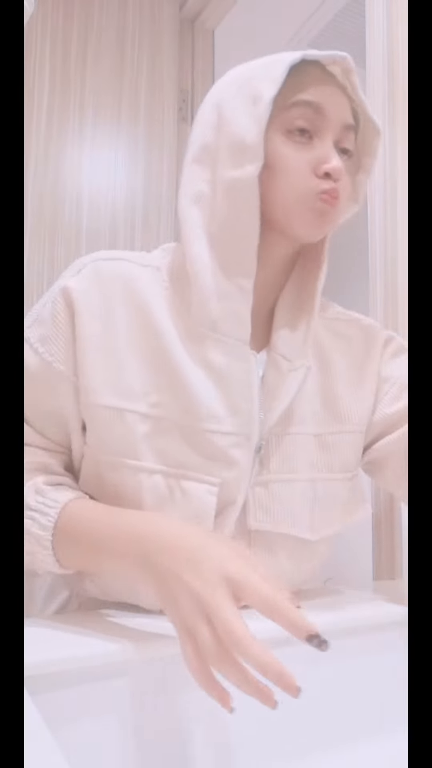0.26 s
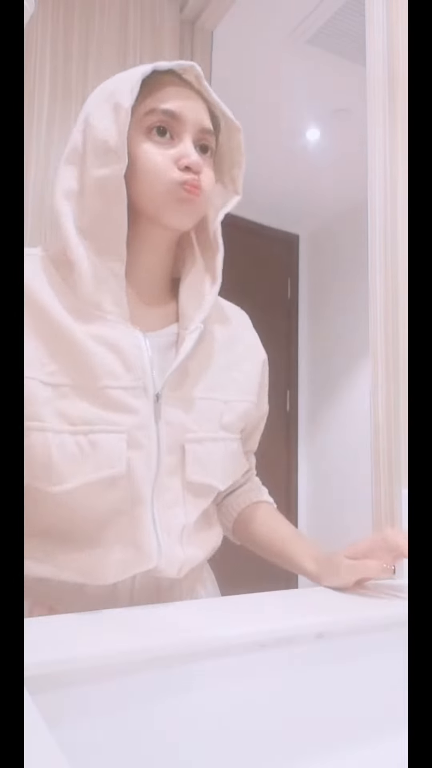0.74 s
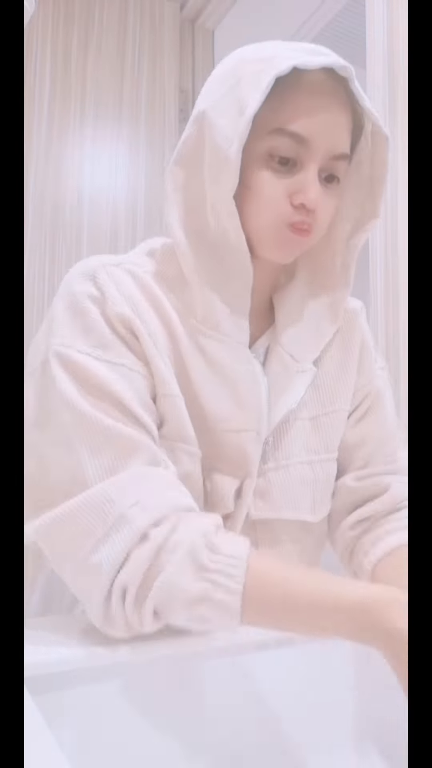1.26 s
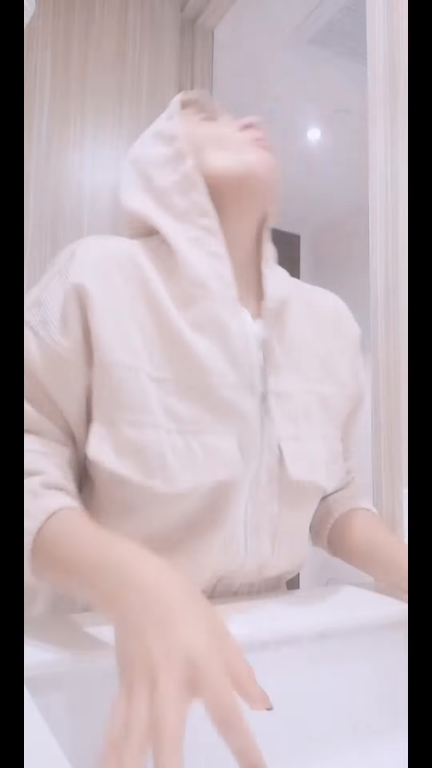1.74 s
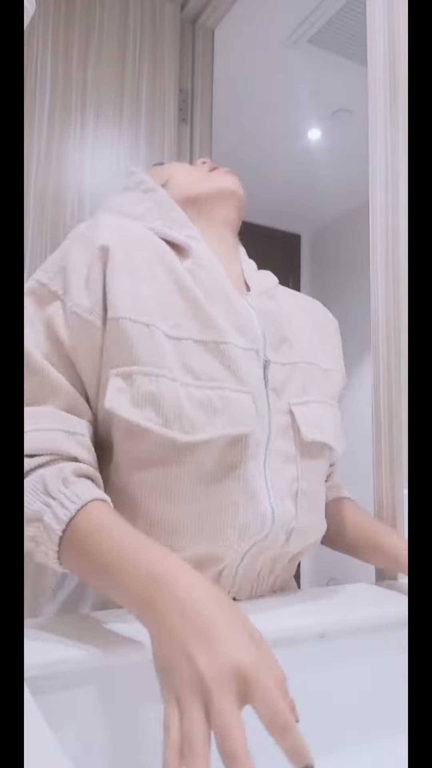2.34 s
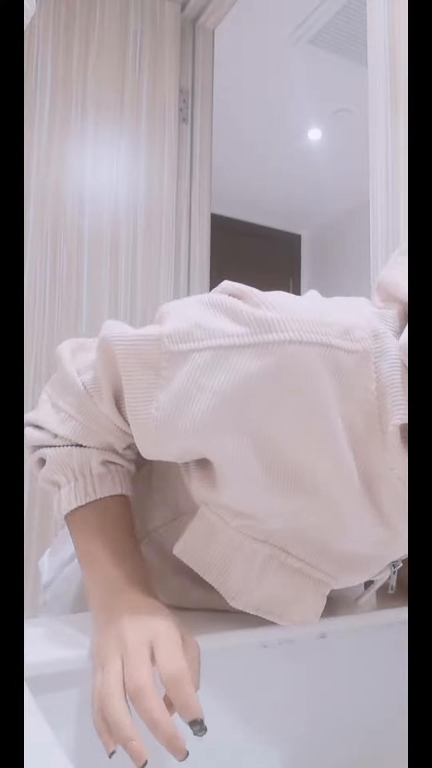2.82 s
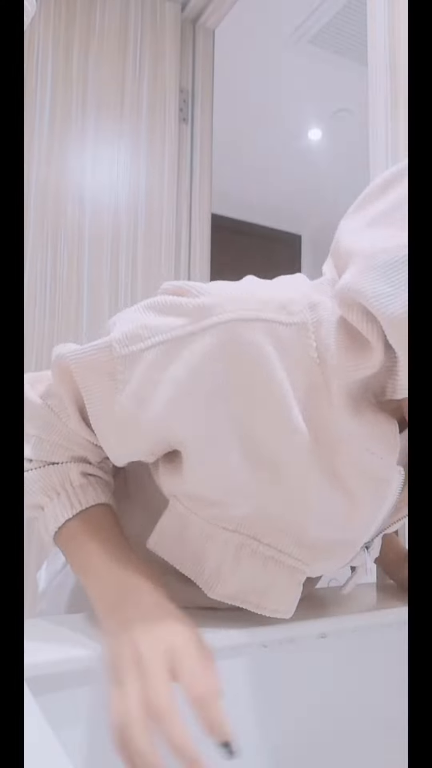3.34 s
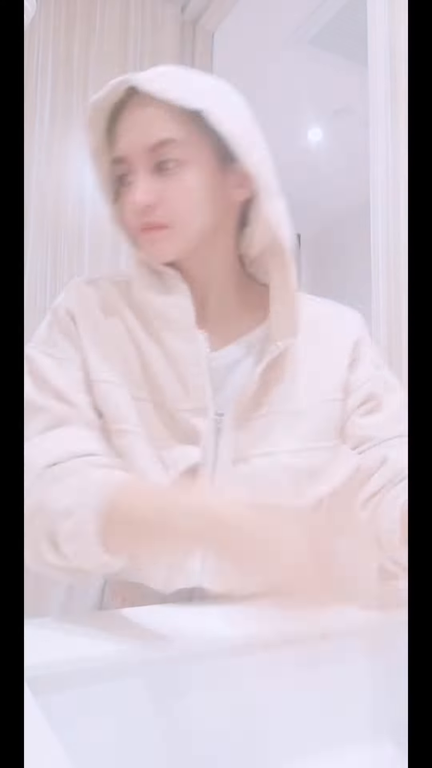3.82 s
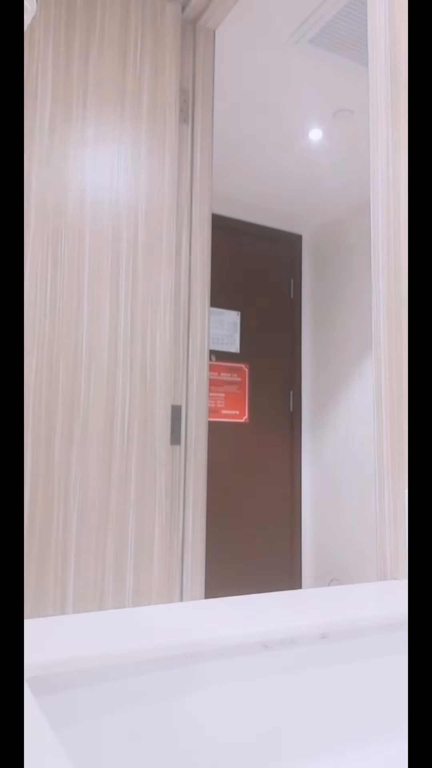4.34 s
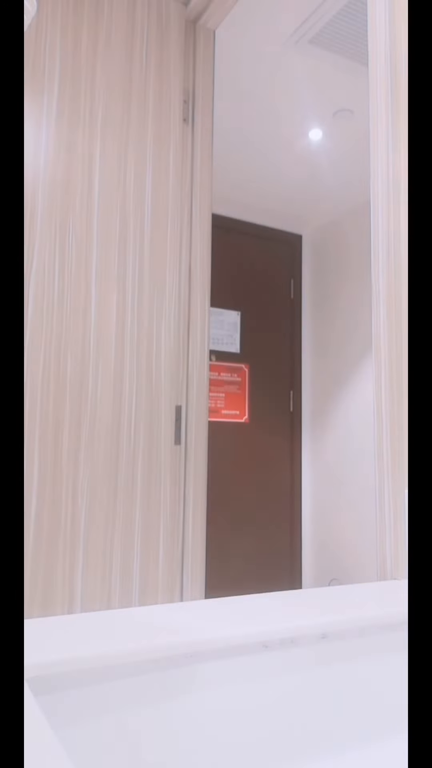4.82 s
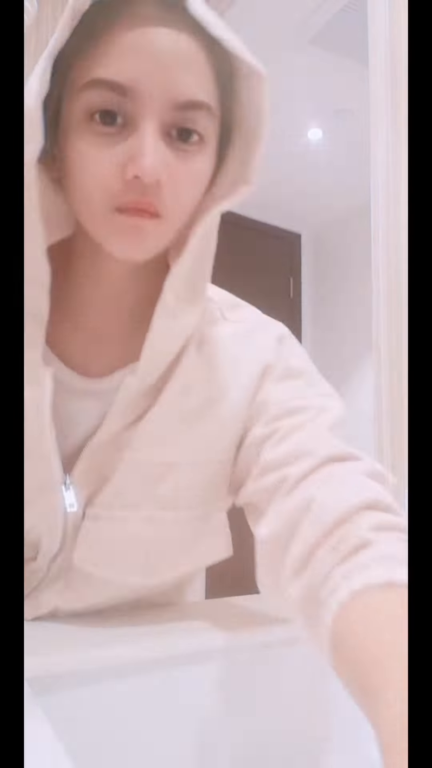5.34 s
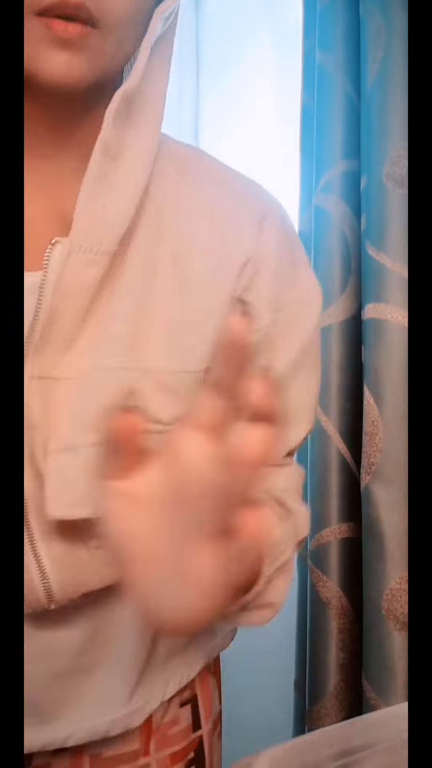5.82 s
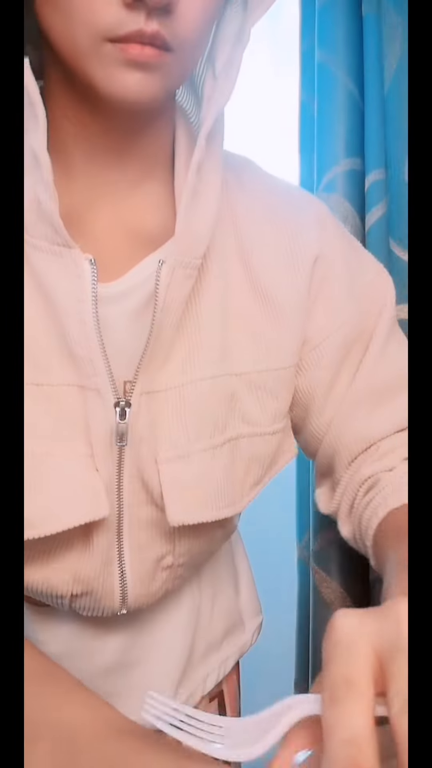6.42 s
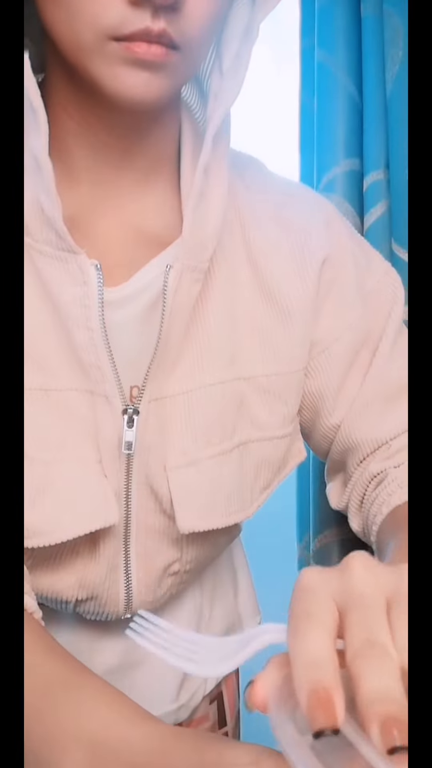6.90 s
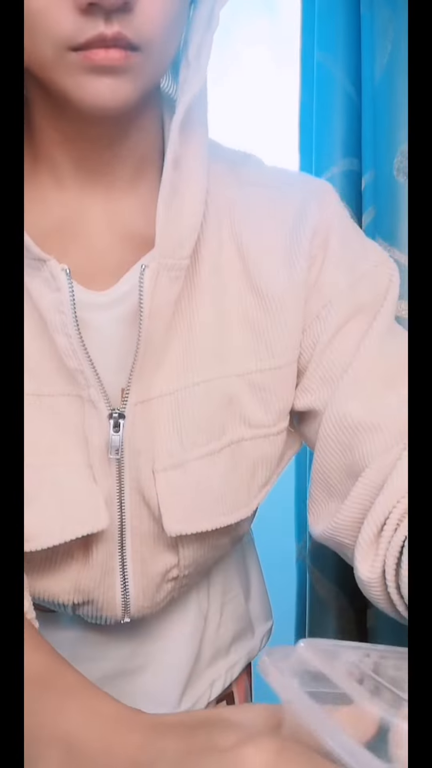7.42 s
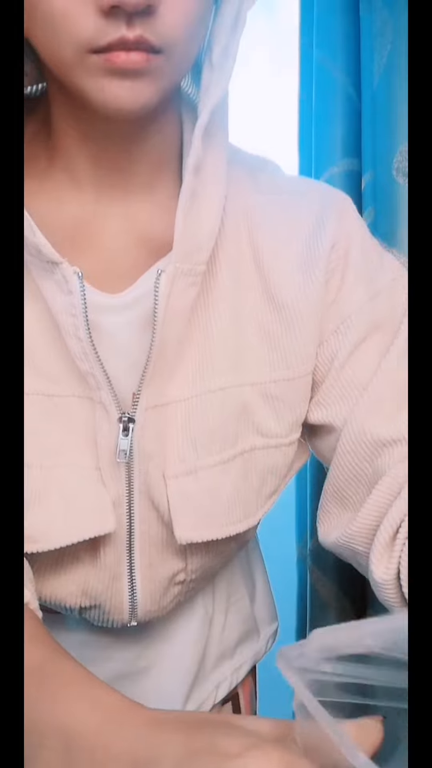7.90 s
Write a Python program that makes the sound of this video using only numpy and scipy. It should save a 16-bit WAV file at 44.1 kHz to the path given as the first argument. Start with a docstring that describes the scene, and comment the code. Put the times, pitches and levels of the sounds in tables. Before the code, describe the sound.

Close phone microphone in a small bathroom: a tap hisses hard into a basin while the drain gurgles, with low knocks at the start and splashing hands, plus one heavy thump midway. The water cuts off abruptly, a few drops plink and cloth rustles faintly over low room rumble. A blink of near silence, then a quieter room where a thin plastic food box snaps, creaks and scrapes irregularly until the end.

```python
"""First you hear a tap hissing into a bathroom basin, a gurgling drain, and hands that knock and splash.
The tap shuts, drops fall and cloth brushes; the sound almost vanishes for a moment, then a quieter room
follows, where a thin plastic food box and fork snap and scrape. Water and plastic noises are shaped random
noise; drain bubbles, drops and knocks are fading tones. One phone microphone, the same in both channels."""
import sys
import numpy as np
from scipy import signal
from scipy.fft import rfft, irfft, next_fast_len
from scipy.io import wavfile
from scipy.ndimage import uniform_filter1d, map_coordinates

SR = 44100
rng = np.random.default_rng(int(sys.argv[2]) if len(sys.argv) > 2 else 0)


def store_wav(level_fs):
    """Save 16-bit WAV to argv[1]."""
    pcm = np.round(np.clip(np.atleast_2d(level_fs), -1, 1) * 32767)
    wavfile.write(sys.argv[1], SR, pcm.T.astype(np.int16))


N = 359856

# Colour of the water's hiss: (frequency [Hz], level [dB per Hz])
HISS_COLOUR = [(290, -32), (500, -14.5), (925, -8), (1080, -0.5), (1380, -7.5), (1760, -1.5), (2060, -7),
               (2830, 1.5), (3450, -8), (5950, -5.5), (9400, -8), (11700, -11.5), (15300, -21.5)]
# Bands lifted by the basin's bowl: (frequency [Hz], width [Hz], lift [dB])
BOWL_BANDS = [(1040, 180, 1.5), (1750, 110, 3.5), (2814, 430, -4.5), (4430, 180, 0.5), (5950, 260, 2.5),
              (9000, 670, 1), (12765, 32, 3), (12700, 36, 2)]
# Hands cross the jet and shade it: (start [s], end [s], hiss lost [dB])
HANDS_IN_JET = [(1.12, 1.298, 2), (1.334, 1.437, 5.5), (1.447, 1.72, 3)]
# The jet's steady hiss, and its splash and finest spray compared with that hiss [dB]
HISS_DB, SPLASH_DB, SPRAY_DB = -22.5, -4, -10.5
# Each dB of hiss lost to a hand changes splash and spray by this many dB
HAND_EDGE_S, HAND_SPLASH, HAND_SPRAY = 0.04, 1.36, -0.6
# The valve closes ever faster; splash and spray fade faster still
SHUT_S, SHUT_DB_PER_S2, DULL_DB_PER_S = 4.01, 4000, 130

# Bubbles gulped by the drain: (time [s], level [dB])
GURGLE_LEVEL = [(0.0, -20.5), (0.2, -24), (0.5, -28), (0.66, -21.5), (0.88, -21.5), (1.0, -27),
                (1.12, -24.5), (1.21, -45), (1.33, -25.5), (1.4, -34), (1.445, -21.5), (1.54, -35.5),
                (1.7, -34), (1.79, -23.5), (1.92, -19.5), (2.07, -24), (2.55, -27), (2.66, -21.5),
                (2.85, -26.5), (3.17, -27), (3.24, -38.5), (3.98, -41.5), (4.03, -33), (4.17, -39),
                (4.22, -26), (4.27, -55)]
# Bubble sizes: (frequency [Hz], pitch spread [natural log], rate [per s],
# life [cycles; a 60 dB fade takes three times as many], level [dB])
BUBBLE_SIZES = [(349.4, 0.047, 200, 11.2, 1.5), (805, 0.023, 28, 14, -14), (1070, 0.03, 28, 46, -18.5)]
GULP_DB = 1.4  # strength of the quick surges

# Snaps of the plastic: (time [s], level [dB], low band [dB], high band [dB], panel frequency [Hz])
BOX_SNAPS = [(6.109, -8.5, -13, -15, 1720), (6.115, -9.5, 4, -4.5, 2080), (6.128, -14, -11, -13, 1490),
             (6.16, -16, 9, -18, 1950), (6.171, -18, 2, -18, 1600), (6.264, -12.5, -2, -16, 1605),
             (6.305, -10, -2.5, -19.5, 1650), (6.398, -8, -6.5, -12, 1460), (6.438, -19, -2, -24, 1410),
             (6.459, -18, -9, -20, 1300), (6.552, -19, -6, -14, 1660), (6.581, -16.5, -25, -17, 1380),
             (6.6, -28, -22, 3, 1630), (6.623, -20, -3.5, -19, 1700), (6.684, -28.5, -1, -13, 1580),
             (6.806, -12.5, -14, 0.5, 5800), (6.85, -1.5, -22, -13.5, 2280), (6.968, -30.5, -6, -18, 2250),
             (7.134, -26.5, 2.5, -9, 4370), (7.359, -21, -17, -6.5, 2060), (7.427, -17.5, -6, -11, 1420),
             (7.483, -5.5, -3.5, -8, 2720), (7.591, -21, -12, -14, 1710), (7.629, -9, -18, -14, 1350),
             (7.639, -11.5, -13, -5.5, 2050), (7.794, -20, -6, -19, 1990), (7.866, -19, -18, -4, 2060),
             (7.891, -4.5, -4.5, -4.5, 1130), (7.954, -11.5, -6, -6, 1190), (8.007, -10.5, -9, -8, 2640),
             (8.037, -17, -8, -2.5, 2940), (8.085, -7.5, -5, -16, 2820), (8.095, -13.5, -12, -16, 1300)]
# Slips and scrapes of the lid: (start [s], end [s], level [dB], low band [dB], high band [dB],
# panel frequency [Hz], swell [share of the length])
LID_SCRAPES = [(6.092, 6.118, -25.5, -1, -5.5, 7500, 0.37), (6.114, 6.167, -21.5, 4.5, -16, 2160, 0.17),
               (6.201, 6.242, -25, 7.5, -12.5, 3500, 0.39), (6.329, 6.373, -10, -12.5, -19.5, 1440, .45),
               (6.337, 6.37, -15.5, -9.5, -27, 3050, .4), (6.476, 6.523, -34, -8, -6, 2480, 0.35),
               (6.552, 6.622, -34, -13, -9, 1600, 0.34), (6.779, 6.825, -33, -9, 0, 4970, .5),
               (6.824, 6.879, -25.5, -16, -6.5, 2340, 0.55), (7.196, 7.235, -14.5, 0, -15, 3130, 0.43),
               (7.344, 7.383, -28.5, -8, -12.5, 2200, .5), (7.43, 7.457, -41, -5, 1, 7540, .15),
               (7.459, 7.507, -32.5, -17, -4, 2500, .4), (7.55, 7.57, -44, -8, -5, 2000, .4),
               (7.586, 7.666, -33, -7, -9, 2000, .2), (7.737, 7.77, -31.5, -3.5, -11, 2490, 0.11),
               (7.788, 7.818, -25.5, -10, -10, 2900, 0.13), (7.821, 7.858, -22.5, -11.5, -16, 1970, 0.11),
               (7.858, 7.9, -24.5, -5.5, -11, 2900, .12), (7.892, 7.928, -16.5, 1, -7, 2970, 0.35),
               (7.957, 7.986, -38, 1, -4, 2500, .2), (8.01, 8.051, -36, -13, 2, 7950, .15),
               (8.05, 8.084, -22, -7, -12, 2840, .13), (8.096, 8.141, -15, -7.5, -7.5, 3100, 0.42)]
# Faint creaking in the hands: (time [s], level [dB])
CREAK_LEVEL = [(6.06, -56), (6.15, -49.5), (6.45, -39), (6.54, -49), (6.66, -52), (6.93, -68), (7.2, -60),
               (7.6, -53), (7.77, -47.5), (7.85, -38), (7.97, -40.5), (8.16, -43)]
# Resonances of the box: (frequency [Hz], width [Hz], strength [dB, halved in plastic()])
BOX_RESONANCES = [(697, 230, -6.5), (1600, 39, -39), (2100, 41, -19), (2520, 60, -27), (2780, 23, -38),
                  (5570, 250, -10), (7400, 93, -53)]
# Broad colour of the plastic: (frequency [Hz], level [dB per Hz])
PLASTIC_COLOUR = [(88, -16), (150, -9), (466, -2), (689, -3.5), (1790, -21), (3770, -21.5), (5460, -22.5),
                  (7770, -21.5), (14500, -40), (16000, -55)]
SNAP_T60_S = 0.018  # 60 dB fade of a snap's middle band
CRACK = 6.4  # the sudden kick of a snap over its rattle
CREAK_LOW_DB = -0.5  # the creak's low band compared with its middle band
# The second room answers the box
ECHO_DB, ECHO_T60_S, ECHO_DULL_HZ = -22.5, 0.22, 4000

# Knocks on counter and table: (time [s], thud [dB before the lift in rings()],
# frequency [Hz], 60 dB fade [s], hollow clack [dB])
KNOCK_HITS = [(0.062, -7, 201.4, 0.21, -19), (0.09, -9.5, 206, 0.17, -18), (0.171, -12, 152, 0.15, -23),
              (0.374, -10, 209.4, 0.24, -24.5), (0.43, -13.5, 221, 0.22, -30),
              (2.886, 2.5, 145.3, 0.067, -12.5), (6.116, -16.5, 245, 0.12, -36),
              (7.8, -18.5, 250, 0.052, -24), (7.893, -27, 135, 0.15, -32), (8.005, -13.5, 192, 0.042, -42)]
# The hollow clack of every knock: (frequency [Hz], width [octaves], rise [s], 60 dB fade [s])
CLACK_SHAPE = (807, 0.35, 0.00502, 0.11)
# Water thrown into the basin, and the sharp crack of the loud knock near 2.89 s: (time [s], level [dB],
# frequency [Hz], width [octaves], 60 dB fade [s])
WATER_SPLASHES = [(1.28, -20, 2500, .9, .1), (1.3, -26, 980, 0.31, 0.45), (1.385, -17, 5000, 0.99, 0.11),
                  (1.435, -26, 4000, 1, 0.086), (1.599, -25.5, 1770, 0.089, 0.31),
                  (1.64, -20, 2500, 1.1, 0.082), (1.688, -18, 3500, 1, 0.14),
                  (2.602, -14.5, 4000, 1.04, 0.092), (2.708, -13.5, 1340, 0.69, 0.099),
                  (2.891, -13.5, 2180, 0.69, .035), (2.902, -15, 1470, 0.35, .12),
                  (3.6, -27.5, 1200, .4, .22)]
# Cloth and hands brush and tick: (time [s], level [dB], frequency [Hz], width [octaves], 60 dB fade [s])
CLOTH_RUSTLES = [(4.107, -38, 9500, .27, .04), (4.126, -40, 6500, .6, .07), (4.151, -44, 9500, .3, .04),
                 (4.196, -32, 7400, .38, 0.061), (4.255, -47, 6500, .7, .07),
                 (4.285, -35.5, 2730, .31, .06), (4.355, -36, 2090, .25, .15), (4.39, -41, 5000, 0.83, .12),
                 (4.437, -35.5, 2550, .9, 0.097), (4.586, -44, 5000, .55, 0.047),
                 (4.652, -39, 2423, .2, .06), (4.73, -38, 4420, 0.76, 0.13),
                 (5.108, -19.5, 1450, 0.96, 0.061), (5.231, -38, 3580, 0.83, .14),
                 (5.269, -41, 4000, 0.89, .09), (5.333, -41, 2930, 0.92, 0.067),
                 (5.355, -43, 3500, 1.4, 0.072), (5.478, -42.5, 6900, .44, 0.06),
                 (5.519, -51, 9000, .4, .04), (5.601, -45.5, 3000, 1.15, 0.091)]
SPLASH_RISE, RUSTLE_RISE = 0.1, 0.16  # rise setting as a share of the 60 dB fade
# Water sloshes in the bowl after a knock: (level at the start [dB], frequency [Hz], width [octaves])
SLOSH_SOUND = (-11.5, 840, 0.28)
# When it sloshes: (start [s], end [s])
SLOSH_TIMES = (2.903, 2.967)
SLOSH_EDGE_S, SLOSH_SAG_DB_PER_S = 0.006, 90
# Drops and bubbles: (time [s], level [dB before the lift in rings()], frequency [Hz], 60 dB fade [s])
WATER_DROPS = [(4.1, -30, 880, 0.09), (4.105, -24, 1100, 0.055), (4.17, -14, 1055, 0.05),
               (4.2, -15, 1020, 0.074), (4.21, -23, 848, 0.091), (4.215, -38, 363, 0.043),
               (4.283, -30, 2520, 0.045), (4.338, -24, 1810, 0.043)]

# Noise of each room: (time [s], boom [dB], air [dB])
BATHROOM_LEVEL = [(0.0, -35, -35), (0.4, -27.5, -29), (0.9, -33.5, -38.5), (2.0, -33, -35), (2.8, -32, -28),
                  (3.4, -39, -35.5), (3.95, -28.5, -36.5), (4.15, -24.5, -29.5), (4.4, -27, -30),
                  (4.7, -31.5, -31), (5.54, -30.5, -31)]
SECOND_ROOM_LEVEL = [(5.6, -41, -42), (6.1, -39, -43), (6.4, -33.5, -34), (6.77, -39, -44.5),
                     (7.45, -45.5, -43), (8.16, -43, -53)]
# Colour of the air noise in each room: (frequency [Hz], level [dB per Hz])
BATHROOM_AIR = [(15, -64), (25, -9), (151, -2.5), (442, -21), (756, -30), (913, -26.5), (1260, -33.5),
                (1560, -41.5), (1790, -35.5), (2400, -41.5), (2670, -35.5), (3220, -48.5), (9190, -56),
                (15300, -73)]
SECOND_ROOM_AIR = [(15, -50), (25, -29), (54, 2), (104, -23), (173, -11.5), (208, -19.5), (366, -24),
                   (506, -28), (563, -21), (610, -26.5), (963, -32), (1480, -40), (2740, -43),
                   (15300, -66.5)]
# Near silence between the rooms: (start [s], end [s])
SILENCE_TIMES = (5.545, 5.588)
# Tap, drain and bathroom noise dip at the loudest knock and creep back
DIP_S, DIP_DB, RECOVER_S = 2.885, 5.5, 0.25
# Colour of the phone's microphone: (frequency [Hz], level [dB])
MICROPHONE_COLOUR = [(30, -7), (90, -3), (150, -2.5), (7500, -1), (8300, -3), (9400, 1), (10400, -3.5),
                     (11500, -8), (15250, -1), (15500, -37)]
TOP_HZ = 16430  # nothing passes from here up


def tap():
    """Dense droplets hiss in the basin, whose bowl lifts a few fixed bands."""
    t = np.arange(N) / SR
    shade_db = np.zeros(N)
    for start, end, lost_db in HANDS_IN_JET:
        shade_db += lost_db * np.clip(np.minimum(t - start, end - t) / HAND_EDGE_S, 0, 1)
    closing = np.maximum(t - SHUT_S, 0)
    droplets = patchy(depth_db=1) * amp(0.71 * wobble(400) + 0.1 * wobble(24.66))

    def colour(f):
        lift_db = sum(db / (1 + (2 * (f - hz) / width) ** 2) for hz, width, db in BOWL_BANDS)
        return amp(along(HISS_COLOUR, f) + lift_db)

    splash, hiss, spray = bands(filtered(droplets, colour), 3600, 12000)
    splash = amp(SPLASH_DB + HAND_SPLASH * shade_db) * splash
    spray = amp(SPRAY_DB + HAND_SPRAY * shade_db) * spray
    water = hiss + amp(-DULL_DB_PER_S * closing) * (splash + spray)
    return amp(HISS_DB - shade_db - SHUT_DB_PER_S2 * closing ** 2) * water


def drain():
    """Air pockets of three sizes ring briefly, each at its own pitch, rising a little."""
    level_db, flowing = curves(GURGLE_LEVEL)
    out, t = np.zeros(N), np.arange(SR // 8) / SR
    for centre_hz, spread, rate, cycles, size_db in BUBBLE_SIZES:
        # one row per bubble: its pitch, loudness and phase
        draws = rng.standard_normal((int(rate * 4.4), 3))
        starts = rng.uniform(0, 4.3 * SR, len(draws)).astype(int)
        hz = centre_hz * np.exp(spread * draws[:, :1])
        fade = amp(2 * draws[:, 1:2] - 60 * t * hz / (3 * cycles))
        rise = 1 - np.exp(-t * hz / 0.65)
        pockets = fade * rise * np.sin(2 * np.pi * hz * t * (1 + 0.4 * t) + 3 * draws[:, 2:])
        places = starts[:, None] + np.arange(len(t))
        train = np.bincount(places.ravel(), pockets.ravel(), N)[:N]
        out += amp(size_db) * train / np.std(train[:4 * SR])
    return flowing * amp(level_db + GULP_DB * wobble(16)) * out


def box():
    """Stick-and-slip forces shake the thin box: snaps and scrapes over a faint creaking."""
    return creaks() + snaps() + scrapes()


def creaks():
    """Small uneven slips make the plastic creak."""
    level_db, handled = curves(CREAK_LEVEL)
    force = slips(N, grain_db=1.5) * amp(5.0 * wobble(40))
    low, middle, high = bands(filtered(force, plastic), 1040, 3000)
    return handled * amp(level_db) * (amp(CREAK_LOW_DB) * low + middle + 0.68 * high)


def snaps():
    """Strain builds, the lid cracks, then the panels rattle on, the treble dying first."""
    out, t = np.zeros(N), np.arange(SR // 8) / SR
    since = t - 0.008  # time since the crack

    def envelope(t60):
        build = amp(9 * since / 0.00033) + 0.073 * t / 0.01
        rattle = amp(-60 * since / t60) + 0.051 * amp(-60 * since / (6 * t60))
        return np.where(since < 0, build, rattle)

    for s, db, low_db, high_db, panel_hz in BOX_SNAPS:
        kick = CRACK * (np.arange(len(t)) == round(0.0084 * SR))
        low, middle, high = shaken(slips(len(t), grain_db=2.5) + kick, low_db, high_db, panel_hz)
        snap = low * envelope(1.25 * SNAP_T60_S) + middle * envelope(SNAP_T60_S)
        snap = snap + high * envelope(0.63 * SNAP_T60_S)
        # even out the energy; the middle band sits at -7 dB, so its power is -13 dB or so
        power = amp(2 * low_db) + amp(-13) + amp(2 * high_db)
        size = np.sqrt(np.sum(snap ** 2) / np.sum(envelope(SNAP_T60_S) ** 2) / power)
        add(out, s - 0.007, amp(db) * snap / size)
    return out


def scrapes():
    """The lid slips along in strokes that swell and fade."""
    out, t = np.zeros(N), np.arange(SR // 8) / SR
    for start, end, db, low_db, high_db, panel_hz, edge in LID_SCRAPES:
        ramp = np.clip(edge, 0.05, 0.5) * (end - start)
        swell = np.clip(t / ramp, 0, 1) ** 1.4
        fade = amp(-14 * np.maximum(t - (end - start - ramp), 0) / ramp)
        scrape = sum(shaken(slips(len(t), grain_db=2.5), low_db, high_db, panel_hz))
        add(out, start, amp(db) * swell * fade * scrape)
    return out


def shaken(force, low_db, high_db, panel_hz):
    """The box driven by a force; each grip frees another panel and damps the other modes unevenly."""
    grip_db = 2.7 * rng.standard_normal(40)

    def colour(f):
        panel = 1 + 1.66 / (1 + ((f - panel_hz) / (0.11 * panel_hz)) ** 2)
        return plastic(f) * panel * amp(np.interp(f, np.linspace(0, 16000, 40), grip_db))

    low, middle, high = bands(filtered(force, colour), 996, 3450)
    return amp(low_db) * low, amp(-7) * middle, amp(high_db) * high


def plastic(f):
    """Colour of the thin box: broad, with its panel resonances."""
    peaks = sum(amp(db / 2) / (1 + (2 * (f - hz) / width) ** 2) for hz, width, db in BOX_RESONANCES)
    return amp(along(PLASTIC_COLOUR, f)) * (0.46 + peaks)


def slips(count, grain_db):
    """Stick and slip: noise in lumps about a millisecond long, a few of them much stronger."""
    knots = np.arange(0, count, 40)
    lumps = np.interp(np.arange(count), knots, rng.exponential(size=len(knots)))
    return rng.standard_normal(count) * amp(grain_db * np.minimum(lumps, 4))


def echo(x):
    """The room sends the sound back as a short, duller tail of fading noise."""
    t = np.arange(SR // 3) / SR
    dull = filtered(rng.standard_normal(len(t)), lambda f: 1 / (1 + (f / ECHO_DULL_HZ) ** 2))
    tail = dull * amp(-60 * t / ECHO_T60_S)
    return x + amp(ECHO_DB) * signal.fftconvolve(x, tail / np.linalg.norm(tail))[:N]


def knocks():
    """A struck surface gives a low thud with a hollow clack just behind it."""
    delay = CLACK_SHAPE[2]  # the clack lags by its own rise setting
    clacks = [(s + delay, clack_db, *CLACK_SHAPE) for s, _, _, _, clack_db in KNOCK_HITS]
    thuds = rings([row[:-1] for row in KNOCK_HITS], 0.0032, 0, rough=0.45)
    return filtered(thuds, lambda f: 1 - 1 / (1 + (f / 85) ** 4)) + puffs(clacks)


def brushes():
    """Splashes and rustles are puffs of noise: the longer the sound, the slower its rise."""
    rows = []
    for table, share in ((WATER_SPLASHES, SPLASH_RISE), (CLOTH_RUSTLES, RUSTLE_RISE)):
        rows += [(s, db, hz, octaves, share * t60, t60) for s, db, hz, octaves, t60 in table]
    return puffs(rows)


def slosh():
    """Water in the bowl makes a hollow rush that sags and stops short."""
    (start, end), (db, hz, octaves) = SLOSH_TIMES, SLOSH_SOUND
    t = np.arange(N) / SR
    rush = filtered(rng.standard_normal(N), hump(hz, octaves))
    # keep its loudness steady
    rush = rush / np.sqrt(np.abs(uniform_filter1d(rush ** 2, size=400)) + 1e-9)
    gate = np.clip(np.minimum(t - start, end - t) / SLOSH_EDGE_S + 0.5, 0, 1) ** 2
    return amp(db - SLOSH_SAG_DB_PER_S * np.clip(t - start, 0, 1)) * gate * rush


def drops():
    """Each drop rings a bubble, which glides up as it nears the surface."""
    return rings(WATER_DROPS, 0.004, 0.013, rough=0.3)


def room(level, air, boom_hz, width_hz):
    """Ventilation: broad air noise and the lowest resonance of the room."""
    boom_db, air_db, _ = curves(level)
    boom = filtered(patchy(depth_db=3.5), lambda f: 1 / (1 + (2 * (f - boom_hz) / width_hz) ** 2))

    def air_colour(f):
        return amp(along(air, f)) * (1 - 0.85 / (1 + (f / 200) ** 4))

    broad = filtered(patchy(depth_db=2.0), air_colour)
    return amp(boom_db) * unit(boom) + amp(air_db) * unit(broad)


def rings(table, attack, glide, rough):
    """Tones that die away, with an optional upward glide and a shaky phase."""
    out, t = np.zeros(N), np.arange(SR // 4) / SR
    for s, db, hz, t60 in table:
        shake = np.interp(t, np.linspace(0, 0.25, 40), rng.standard_normal(40))
        tone = np.sin(2 * np.pi * hz * (t + glide * t * t / t60) + rough * shake)
        # lifted 6 dB ahead of the soft attack
        add(out, s, amp(db + 6.0 - 60 * t / t60) * (1 - np.exp(-t / attack)) * tone)
    return out


def puffs(rows):
    """Grainy puffs of noise that swell to full strength at their listed time and die."""
    out, t = np.zeros(N), np.arange(SR // 3) / SR
    for s, db, hz, octaves, rise, t60 in rows:
        grains_db = 0.84 * np.repeat(rng.standard_normal(len(t) // 60), 60)
        noise = rng.standard_normal(len(t)) * amp(grains_db)
        puff = unit(filtered(noise, hump(hz, octaves)))
        growing = np.exp(-4 * (t / rise / 2 - 1) ** 2)
        dying = amp(-60 * (t - 2 * rise) / t60)
        swell = np.where(t < 2 * rise, growing, dying)
        even = np.linalg.norm(swell) / np.linalg.norm(swell * puff)
        add(out, s - 2 * rise, amp(db) * swell * puff * even)
    return out


def hump(hz, octaves):
    """A smooth, bell-shaped band around one frequency."""
    return lambda f: np.exp(-0.5 * (np.log2((f + 1) / hz) / octaves) ** 2)


def patchy(depth_db):
    """White noise whose gain varies in random patches of time and frequency."""
    z = signal.stft(rng.standard_normal(N), nperseg=512)[2]
    field = uniform_filter1d(uniform_filter1d(rng.standard_normal(z.shape), 6, 0), 10, 1)
    return unit(signal.istft(z * amp(depth_db * unit(field)), nperseg=512)[1][:N])


def bands(x, low_hz, high_hz):
    """Splits a sound into low, middle and high bands, each of rms 1."""
    low = filtered(x, lambda f: 1 / (1 + (f / low_hz) ** 8))
    high = filtered(x, lambda f: 1 - 1 / (1 + (f / high_hz) ** 8))
    return unit(low), unit(x - low - high), unit(high)


def filtered(x, response):
    """Strengthens or weakens each frequency of x by a response."""
    m = next_fast_len(len(x) + 8192)
    return irfft(rfft(x, m) * response(np.fft.rfftfreq(m, 1 / SR)), m)[:len(x)]


def wobble(rate):
    """A smooth random curve through a given number of knots a second."""
    knots = rng.standard_normal(int(N * rate / SR) + 4)
    return map_coordinates(knots, [np.arange(N) * rate / SR])


def curves(rows):
    """One value per sample for each column after the time, and whether the source sounds."""
    s, *columns = np.transpose(rows)
    t = np.arange(N) / SR
    return [np.interp(t, s, column) for column in columns] + [(t >= s[0]) & (t <= s[-1])]


def along(points, hz):
    """Reads a value between (frequency, value) points on a log frequency axis."""
    f, v = np.transpose(points)
    return np.interp(np.log(hz + 1), np.log(f + 1), v)


def amp(db):
    """Decibels to gain."""
    return 10 ** (np.asarray(db) / 20)


def unit(x):
    """Scaled to rms 1."""
    return x / np.sqrt(np.mean(x ** 2) + 1e-20)


def add(track, s, sound):
    """Mixes a sound into a track at a time in seconds."""
    part = track[max(round(s * SR), 0):][:len(sound)]
    part += sound[:len(part)]


def scene():
    """The bathroom, a moment of near silence, the second room."""
    t = np.arange(N) / SR
    bath = tap() + drain() + room(BATHROOM_LEVEL, BATHROOM_AIR, 138, 35.6)
    dip_db = (t > DIP_S) * DIP_DB * np.exp(-np.abs(t - DIP_S) / RECOVER_S)
    bath = amp(-dip_db) * (bath + 0) + drops()
    near = brushes() + slosh() + echo(box()) + knocks()
    second_room = room(SECOND_ROOM_LEVEL, SECOND_ROOM_AIR, 157, 69)
    quiet_from, quiet_to = SILENCE_TIMES
    mono = np.where(t < quiet_from, bath, second_room) + near
    # straight 2.7 ms fades into and out of the near silence, 31 dB down
    fade_out = np.clip((quiet_from - t) / 0.0027, amp(-31), 1)
    fade_in = np.clip((t - quiet_to) / 0.0027, amp(-31), 1)
    mono = mono * np.maximum(fade_out, fade_in)
    return np.array([mono, mono])


def record(dry):
    """The phone colours the sound, clips softly at full scale and keeps nothing above its band limit."""
    mono = filtered(dry[0], lambda f: amp(along(MICROPHONE_COLOUR, f)))
    mono = mono / (1 + np.abs(mono) ** 8) ** (1 / 8)
    mono = filtered(mono, lambda f: f < TOP_HZ)
    return np.array([mono, mono])


dry = scene()
out = record(dry)
store_wav(out)
```